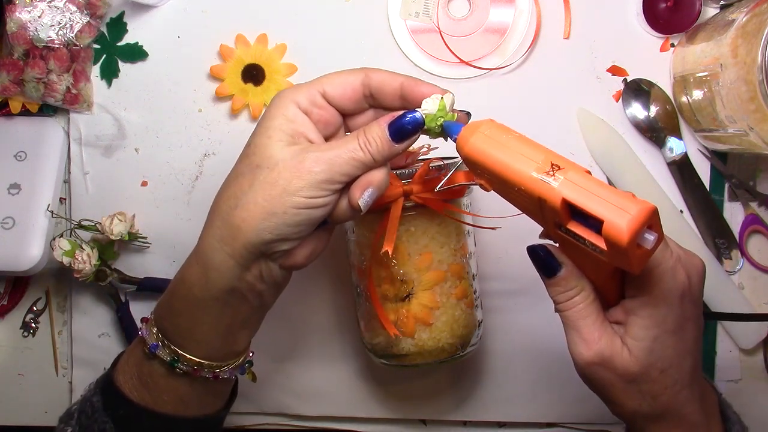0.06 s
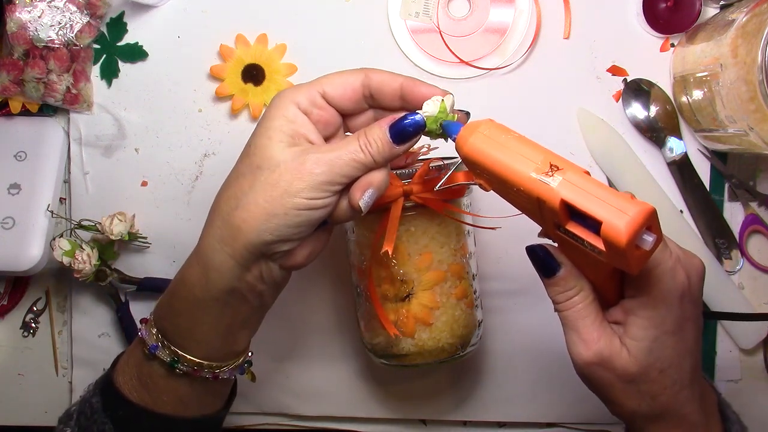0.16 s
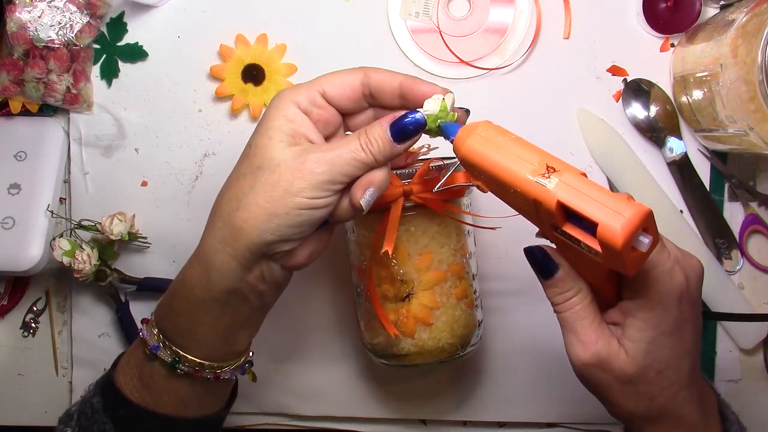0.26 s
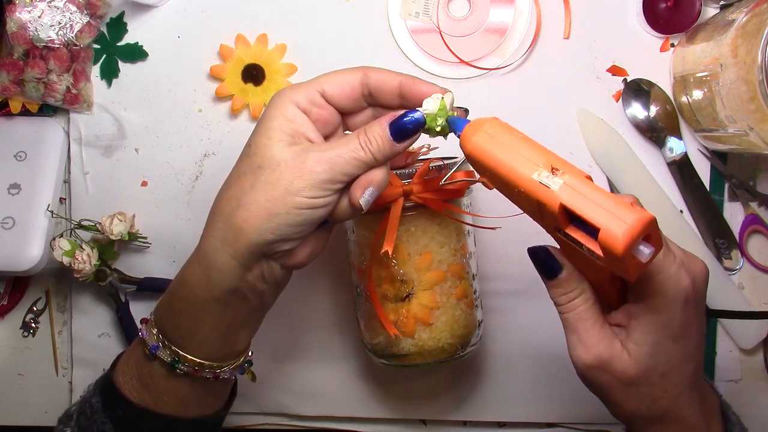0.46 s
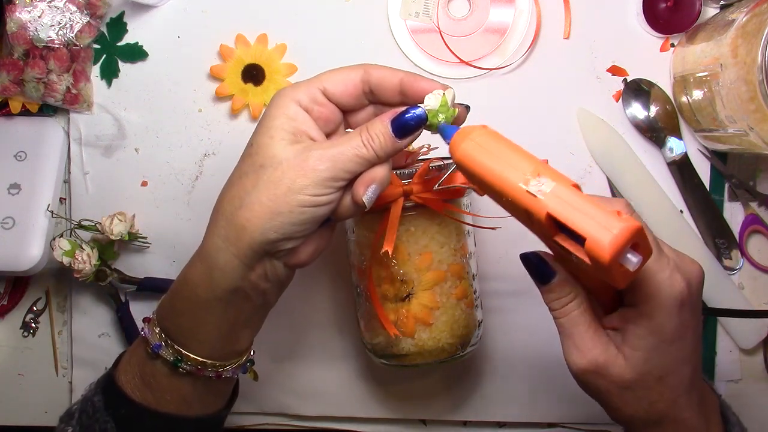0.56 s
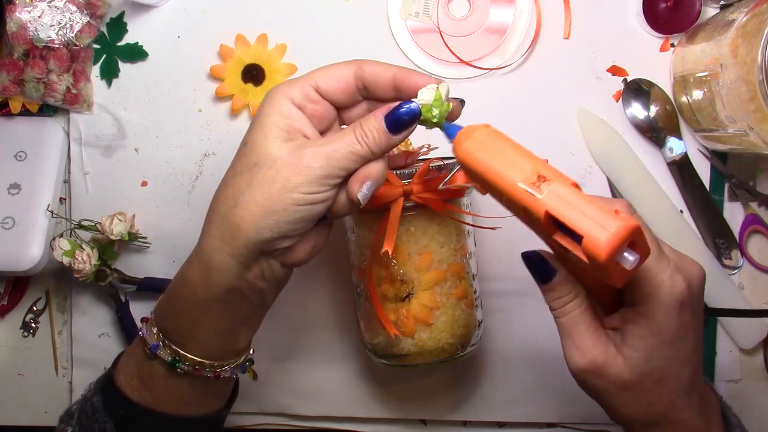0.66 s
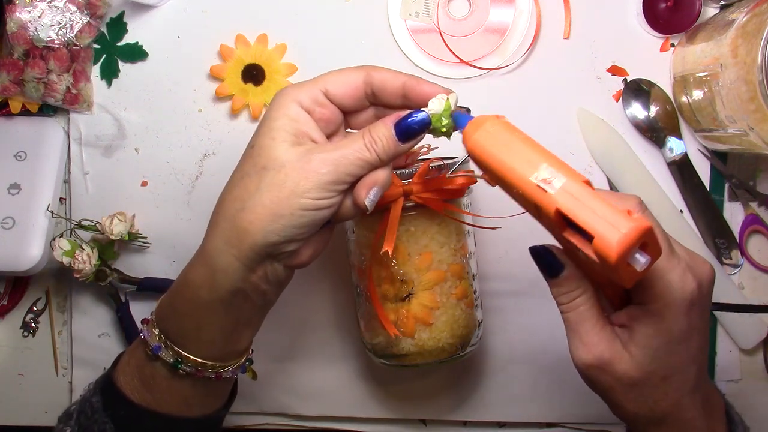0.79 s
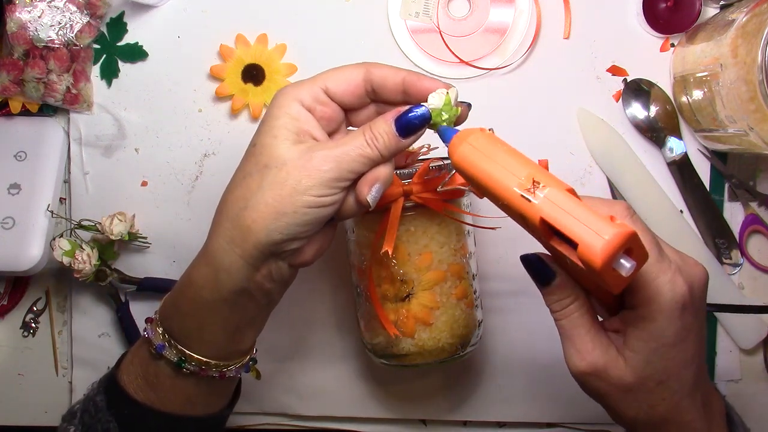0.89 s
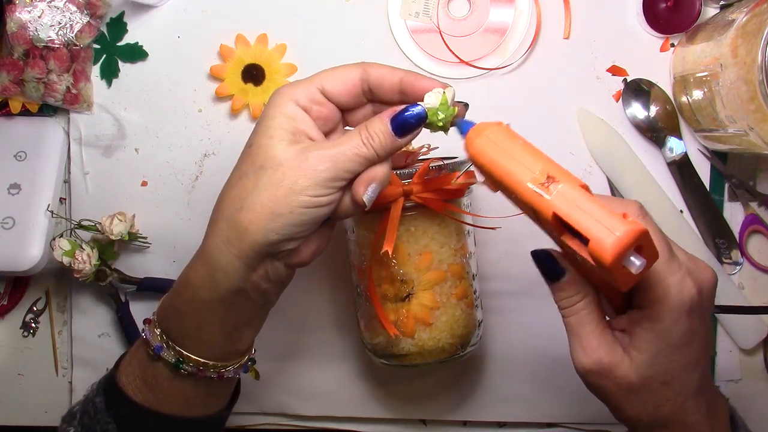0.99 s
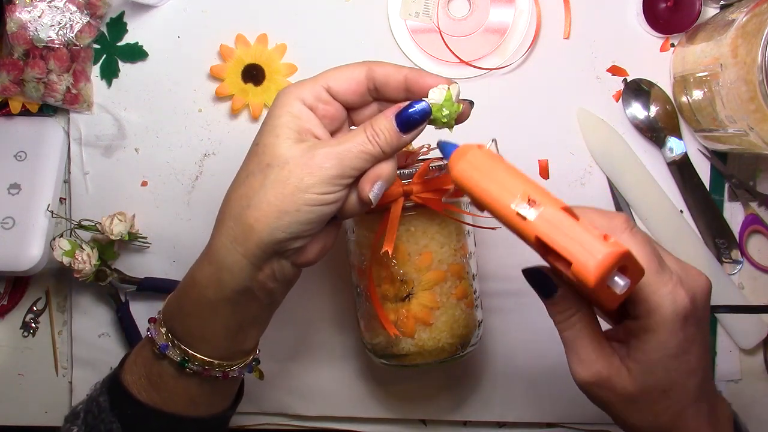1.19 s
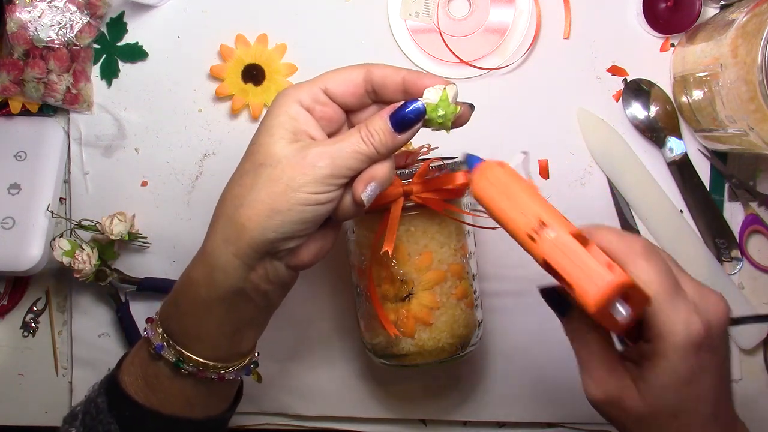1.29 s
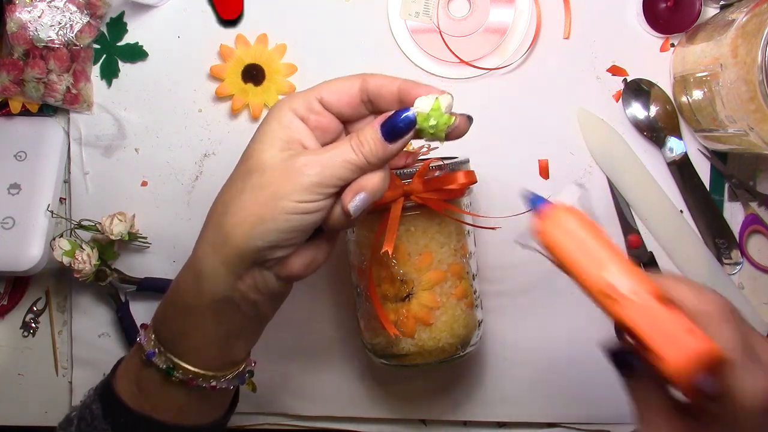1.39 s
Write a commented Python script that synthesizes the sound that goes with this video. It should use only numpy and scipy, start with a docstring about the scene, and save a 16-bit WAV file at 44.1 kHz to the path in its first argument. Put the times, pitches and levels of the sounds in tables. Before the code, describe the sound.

A hot glue gun trigger, close and centred in a small room. Soft hiss first, then three bright plastic ticks at about 0.2, 0.27 and 0.31 seconds. From 0.36 to 0.55 a rapid stick-slip creak of some two dozen clicks, with a dull knock near 0.52. A short decay, then quiet; faint hand rustle around 1.05 and 1.3 with a tiny tick. Barely audible cricket-like chirps and thin high whine throughout.

```python
"""A hot glue gun at a craft table: its plastic trigger moves by stick-slip, three lone ticks and then a fast creaking run.
Each slip and its rebound excite the damped modes of the shell; a table top and a jar add early reflections.
A dull knock sounds near the end of the run, and a diffuse noise tail gives the decay of a small room.
Beneath lie shaped-noise room hiss and hand rustle with a faint tick, a pulsed-sine cricket and a thin steady sine whine."""
import sys
import numpy as np
from scipy import signal
from scipy.fft import rfft, irfft, next_fast_len
from scipy.io import wavfile
from scipy.ndimage import uniform_filter1d

SR = 44100
rng = np.random.default_rng(int(sys.argv[2]) if len(sys.argv) > 2 else 0)


def ratio(d):
    """dB to gain"""
    e = np.asarray(d, float) / 20
    return 10 ** e


def pcm_store(signal):
    """Save signal as 16-bit PCM."""
    levels = np.round(np.clip(np.atleast_2d(signal), -1, 1) * 32767)
    wavfile.write(sys.argv[1], SR, levels.astype(np.int16).T)


N = 63945  # samples in the scene

# slips of the trigger: (time [s], peak before RING_DB [dB], rebound re slip [dB],
# change of the low modes [dB], change of the treble modes [dB])
TRIGGER_SLIPS = [(0.2046, -23, -9, -28, -22), (0.2692, -21, -9, -31, -21), (0.3068, -31, -6, -22, -24),
                 (0.3617, -22, -5, -21, -17), (0.3701, -23, -5, -21, -17), (0.3786, -24, -4, -22, -16),
                 (0.3868, -26, -4, -17, -15), (0.3938, -26, -6, -18, -16), (0.4006, -24, -5, -17, -18),
                 (0.4078, -24, -4, -17, -19), (0.4158, -23, -7, -18, -23), (0.4243, -21, -12, -23, -24),
                 (0.4339, -22, -13, -19, -24), (0.4448, -21, -11, -21, -26), (0.4535, -25, -1, -16, -24),
                 (0.4607, -24, -1, -17, -26), (0.4689, -27, -1, -14, -24), (0.4761, -26, -2, -12, -25),
                 (0.4833, -28, -2, -11, -23), (0.4944, -28, -2, -14, -25), (0.5056, -26, -4, -17, -26),
                 (0.5169, -27, -1, -9, -24), (0.5213, -25, -6, -13, -25), (0.5256, -27, -4, -16, -26),
                 (0.5325, -27, -6, -15, -28), (0.537, -36, -3, -12, -25), (0.5537, -34, -7, -19, -33)]
# modes of the shell before scatter: (frequency [Hz], level with a loose grip [dB],
# level half squeezed [dB], level fully squeezed [dB])
SHELL_MODES = [(1061, 7.5, 7, -21), (1558, -20, 10, -1.5), (1857, 10, 12.5, 6.5), (2247, 10, 4.5, 11),
               (2417, 16, 14.5, 10.5), (2760, -24, -6, -3), (3255, -7.5, 0.5, -3), (3930, -50, -19, -15),
               (4090, 5.5, -8, 2.5), (4440, 5, 5, 6.5), (5160, -17, 8.5, 3), (5570, -11, 1.5, 2.5),
               (6175, -6, 8.5, 2.5), (6790, -1, 6.5, -34), (7100, 7.5, 0, 2.5), (7770, -17, 4, -3.5),
               (8154, 13, 20, 15), (8850, 26, 24, 17), (9700, 21.5, 22, -11), (10270, 19, 16.5, -1),
               (11500, -12, 9, -3), (12430, 14, 0, -1), (14300, -5, 14, 2)]
# hand tightening on the trigger, then easing: (time [s], grip from 0 loose to 1 full [-])
GRIP = [(.31, 0), (.36, 0.415), (.44, 0.52), (.5, 1), (.54, 0.52), (.555, 0.49)]
# reflections off table top and jar: (delay [s], level [dB], lead of left over right [s])
EARLY_ECHOES = [(.0007, -15, .00003), (.0019, -15, -.00002)]
# reverberation of the room: (frequency [Hz], time to fall 60 dB [s])
ROOM_T60 = [(500, 0.24), (2000, 0.21), (5000, 0.19), (12000, 0.078)]
# spectrum of the hiss, relative: (frequency [Hz], density [dB per Hz])
HISS_SPECTRUM = [(12, -59), (20, -28), (186, -2.5), (220, -3.5), (282, -3), (599, -4), (770, -6.5),
                 (1140, -11.5), (1310, -9), (5560, -19.5), (12100, -27.5), (15600, -34)]
# likeness of left and right in hiss and rustle: (frequency [Hz], correlation [-])
CORRELATION = [(60, 0.47), (180, 0.58), (550, 0.51), (1650, 0.69), (4970, 0.83), (15000, 0.88)]
# rise and fall of the rustle: (time [s], level [dB])
RUSTLE_LEVEL = [(.95, -90), (1.04, -62.5), (1.12, -77), (1.2, -84), (1.27, -65.5), (1.31, -61), (1.36, -69),
                (1.45, -65)]
# spectrum of the rustle, relative: (frequency [Hz], density [dB per Hz])
CLOTH_SPECTRUM = [(100, -14), (300, 4), (700, 3.5), (1500, -4), (4000, -13), (10000, -18.5), (15000, -48)]

LOW_MODES_HZ, TREBLE_MODES_HZ = 2600, 8100  # low modes lie below, treble modes above
REBOUND_S, REBOUND_SCATTER_S = 0.00108, 0.00005  # the trigger catches again this soon after a slip
RING_DB, ATTACK_S = -1, 0.00029  # trim of all slips, time constant of their rise
RING_CYCLES, LONGEST_RING_S = 30, 0.02  # a mode falls 60 dB in the shorter of the two
SCATTER_DB, DETUNE = 1.5, 0.01  # standard deviations per jolt: mode level, fraction of mode frequency
CRACK_DB, CRACK_T60_S = -22, 0.0088  # noisy snap on the scale of the modes
SMALL_BODY_HZ = 600  # the small shell radiates weakly below this
KNOCK_S, KNOCK_HZ, KNOCK_DB = 0.5186, 1700, -30  # near the end of the run; level before the rise
KNOCK_T60_S, KNOCK_RISE_S = 0.019, 0.00074
PAN_DB = -0.18  # left gain; the right has the opposite
WET_DB, ROOM_DELAY_S = -11, 0.0055
TAP_S, TAP_DB, TAP_T60_S = 1.310, -59, 0.034  # faint bright tick in the rustle, level before its filter
HISS_DB, CRICKET_DB, WHINE_DB = -60, -76.5, -77  # rms; the cricket at the crest of a chirp
FIRST_CHIRP_S, CHIRP_EVERY_S, CHIRP_S = 0.015, 0.167, 0.075
CRICKET_HZ, WHINE_HZ = 5610, 15734
TOP_HZ = 16700


def unit(x):
    """Normalization to unit mean power (rms 1)."""
    return x / np.sqrt(np.mean(x ** 2) + 1e-20)


def along(points, hz):
    """Interpolation of a (frequency [Hz], value) curve on a logarithmic frequency axis."""
    f, v = np.transpose(points)
    return np.interp(np.log(hz + 1), np.log(f + 1), v)


def filtered(x, response):
    """Linear filtering: the spectrum of x times a frequency response."""
    m = next_fast_len(N + 8192)
    return irfft(rfft(x, m) * response(np.fft.rfftfreq(m, 1 / SR)), m)[..., :N]


def trigger():
    """Stick-slip: each slip and its rebound excite the shell modes, weighted by the grip."""
    out = np.zeros(N + SR)
    t = np.arange(SR // 16) / SR
    hz, *grips_db = np.transpose(SHELL_MODES)[:, :, None]
    for s, db, rebound_db, low_db, treble_db in TRIGGER_SLIPS:
        grip = 2 * np.interp(s, *np.transpose(GRIP))  # 0, 1, 2: loose, half, full
        level_db = sum(max(1 - abs(grip - k), 0) * column for k, column in enumerate(grips_db))
        level_db = level_db + low_db * (hz < LOW_MODES_HZ) + treble_db * (hz > TREBLE_MODES_HZ)
        later = np.maximum(t - rng.normal(REBOUND_S, REBOUND_SCATTER_S), 0)
        slip = ring(t, hz, level_db)
        rebound = ratio(rebound_db) * ring(later, hz, level_db)
        out[round(s * SR):][:len(t)] += ratio(db + RING_DB) * (slip + rebound)
    return radiated(out[:N])


def ring(t, hz, level_db):
    """Modal superposition: decaying sines, each a little off by chance, and a noisy snap; peak 1."""
    level_chance, pitch_chance = rng.standard_normal((2, len(hz), 1))
    t60 = np.minimum(RING_CYCLES / hz, LONGEST_RING_S)
    decay = ratio(level_db + SCATTER_DB * level_chance - 60 * t / t60)
    modes = decay * np.sin(2 * np.pi * hz * (1 + DETUNE * pitch_chance) * t)
    crack = ratio(CRACK_DB - 60 * t / CRACK_T60_S) * rng.standard_normal(len(t))
    jolt = (modes.sum(axis=0) + crack) * (1 - np.exp(-t / ATTACK_S))
    return jolt / np.abs(jolt).max()


def radiated(x):
    """Radiation of a small body (second-order high-pass) and interference with early reflections."""
    ears = np.array([[-0.5], [0.5]])  # left, right

    def response(f):
        paths = 1  # direct sound
        for delay, db, ahead in EARLY_ECHOES:
            paths = paths + ratio(db) * np.exp(-2j * np.pi * f * (delay + ears * ahead))
        return paths * (1j * f / (SMALL_BODY_HZ + 1j * f)) ** 2

    return filtered(x, response)


def knock():
    """Damped oscillation: one decaying sine, a dull knock of the gun near the end of the creaking run."""
    t = np.maximum(np.arange(N) / SR - KNOCK_S, 0)
    decay = ratio(KNOCK_DB - 60 * t / KNOCK_T60_S)
    return decay * np.sin(2 * np.pi * KNOCK_HZ * t) * (1 - np.exp(-t / KNOCK_RISE_S))


def room(x):
    """Diffuse reverberation: convolution with noise that decays at its own speed at each frequency."""
    wet = np.zeros((2, N + SR))
    step = SR // 100  # each 10 ms of sound gets a new tail
    first, last = int(TRIGGER_SLIPS[0][0] * SR), int(TRIGGER_SLIPS[-1][0] * SR)
    for start in range(first, last + step, step):
        hz, t, z = signal.stft(rng.standard_normal((2, SR // 2)), SR, nperseg=128)
        decay = ratio(-60 * t / along(ROOM_T60, hz)[:, None])
        mid, side = signal.istft(z * decay, SR, nperseg=128)[1]
        tail = np.array([mid + 0.18 * side, mid - 0.18 * side]) / np.linalg.norm(mid)
        part = signal.fftconvolve(x[None, start:start + step], tail, axes=1)
        wet[:, start + round(ROOM_DELAY_S * SR):][:, :part.shape[1]] += part
    return wet[:, :N]


def rush(spectrum, patchy_db):
    """Partly coherent stereo noise of rms 1, with random gain over patches of time and frequency."""
    z = signal.stft(rng.standard_normal((2, N)), nperseg=512)[2]
    field = uniform_filter1d(rng.standard_normal(z.shape[1:]), size=6, axis=0)
    field = uniform_filter1d(field, size=12, axis=1)
    pair = signal.istft(z * ratio(patchy_db * unit(field)), nperseg=512)[1][:, :N]

    def mid_side(hz):
        angle = np.arccos(np.clip(along(CORRELATION, hz), -1, 1)) / 2
        return ratio(along(spectrum, hz)) * [np.cos(angle), np.sin(angle)]

    mid, side = filtered(pair, mid_side)
    return unit(np.array([mid + side, mid - side]))


def hiss():
    """Shaped broadband noise at a constant mean level: the hiss of the room."""
    return ratio(HISS_DB) * rush(HISS_SPECTRUM, patchy_db=1)


def rustle():
    """Friction as shaped noise: hand and sleeve shift as the gun is lifted away, with one faint tick."""
    t = np.arange(N) / SR
    s, db = np.transpose(RUSTLE_LEVEL)
    cloth = ratio(np.interp(t, s, db, left=-120)) * rush(CLOTH_SPECTRUM, patchy_db=2.0)
    after = np.maximum(t - TAP_S, 0)
    tick = (t > TAP_S) * ratio(TAP_DB - 60 * after / TAP_T60_S) * rng.standard_normal(N)
    return cloth + filtered(tick, lambda hz: (hz > 2000) * (hz < 13000))


def cricket():
    """Amplitude modulation: half-sine chirps of one pure tone in steady time."""
    t = np.arange(N) / SR
    since = (t - FIRST_CHIRP_S) % CHIRP_EVERY_S
    chirp = np.sin(np.pi * np.minimum(since / CHIRP_S, 1))
    return np.sqrt(2) * ratio(CRICKET_DB) * chirp * np.sin(2 * np.pi * CRICKET_HZ * t)


def whine():
    """Simple harmonic oscillation: a steady high sine that never stops."""
    t = np.arange(N) / SR
    return np.sqrt(2) * ratio(WHINE_DB) * np.sin(2 * np.pi * WHINE_HZ * t)


def scene():
    """Linear superposition of the gun, its room sound and the background."""
    gun = trigger() + knock()
    direct = gun * ratio([[PAN_DB], [-PAN_DB]])
    reverberant = ratio(WET_DB) * room(gun.mean(axis=0))
    return direct + reverberant + rustle() + hiss() + cricket() + whine()


def low_pass(x):
    """Removes everything above the highest recorded frequency."""
    return signal.sosfilt(signal.butter(12, 16850, fs=SR, output="sos"), x)


def record(dry):
    """Band limitation: an ideal low-pass at TOP_HZ, then the last stage above."""
    mix = filtered(dry, lambda hz: hz < TOP_HZ)
    return low_pass(mix)


dry = scene()
out = record(dry)
pcm_store(out)
```